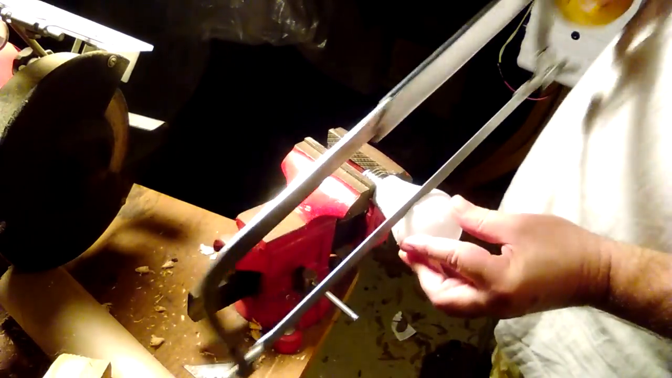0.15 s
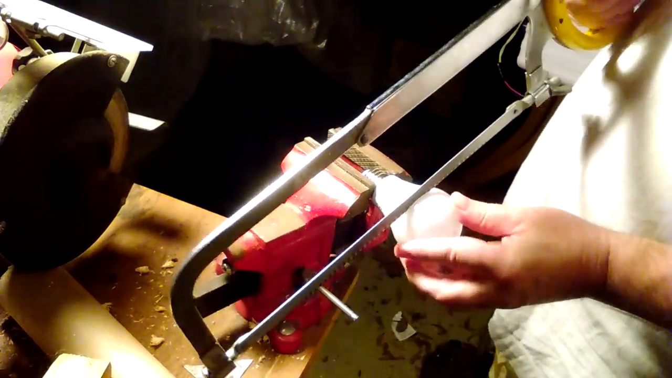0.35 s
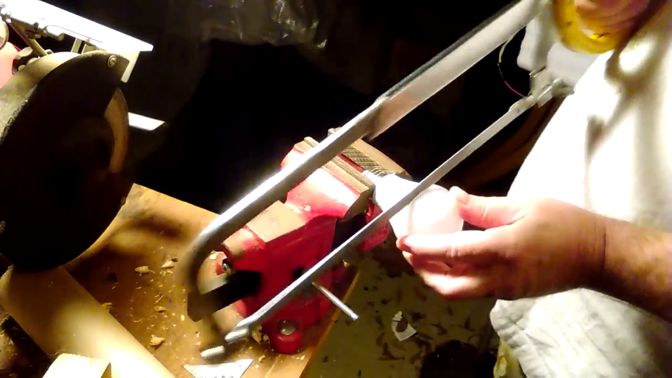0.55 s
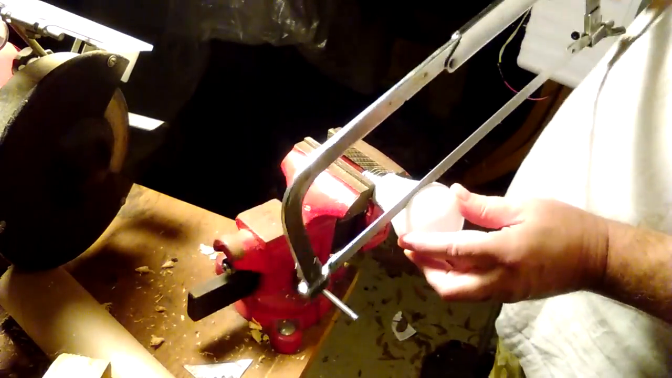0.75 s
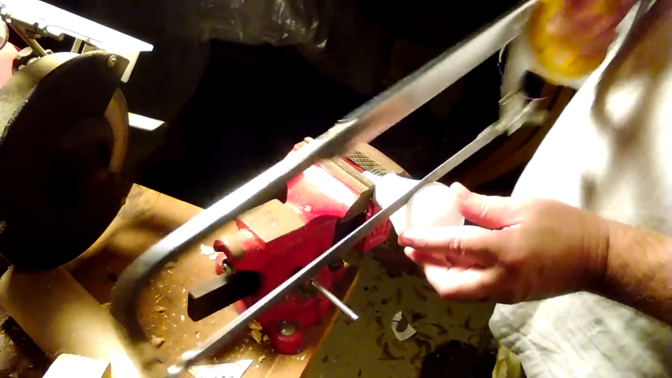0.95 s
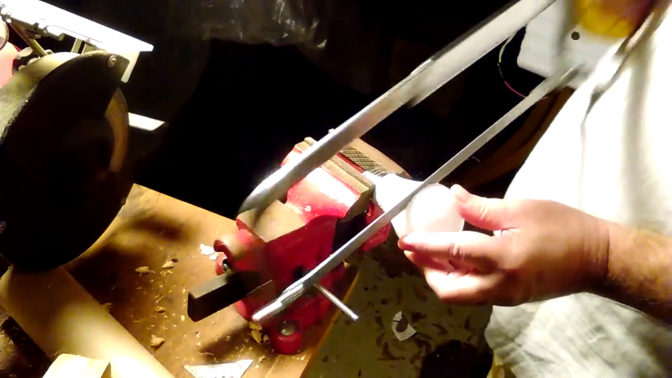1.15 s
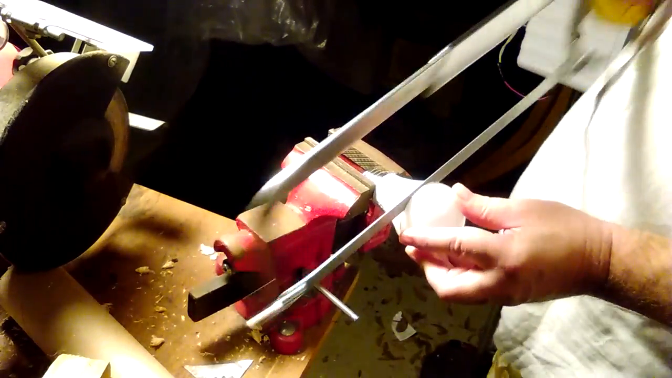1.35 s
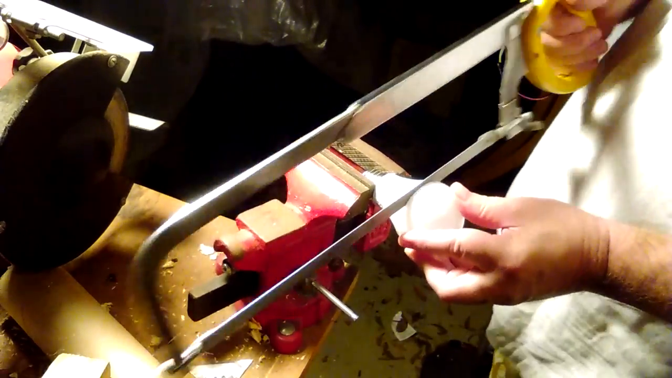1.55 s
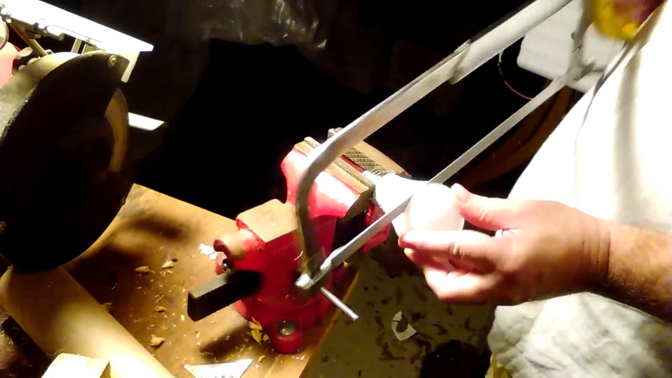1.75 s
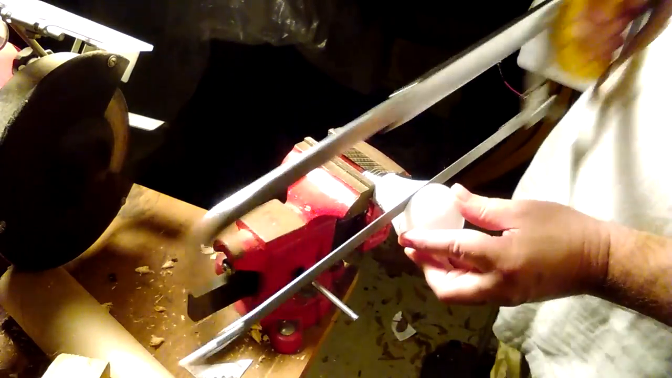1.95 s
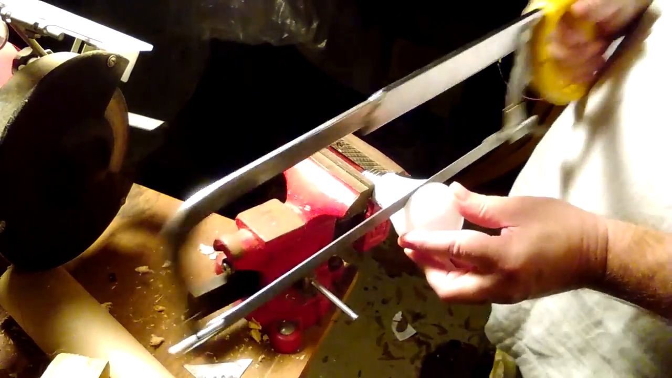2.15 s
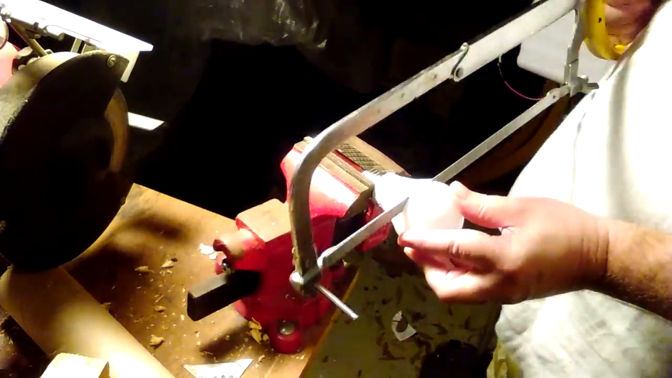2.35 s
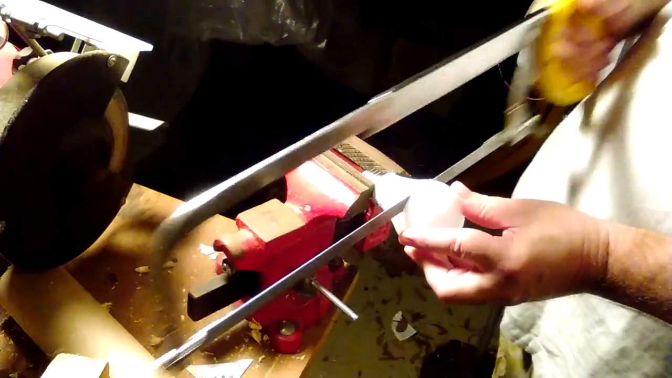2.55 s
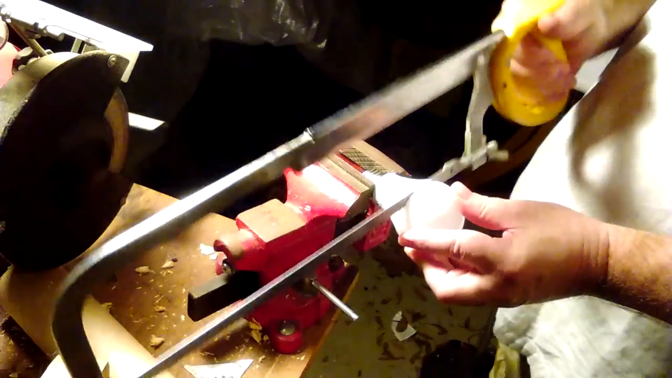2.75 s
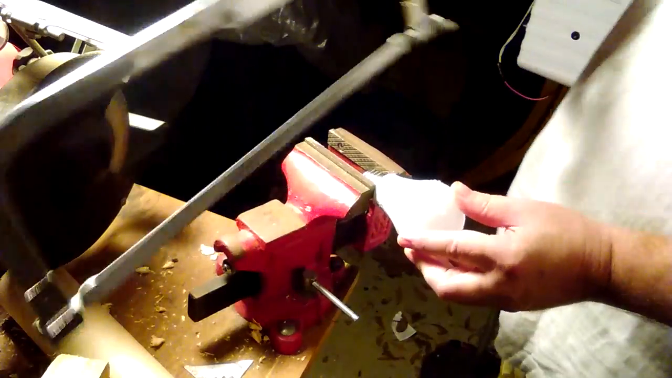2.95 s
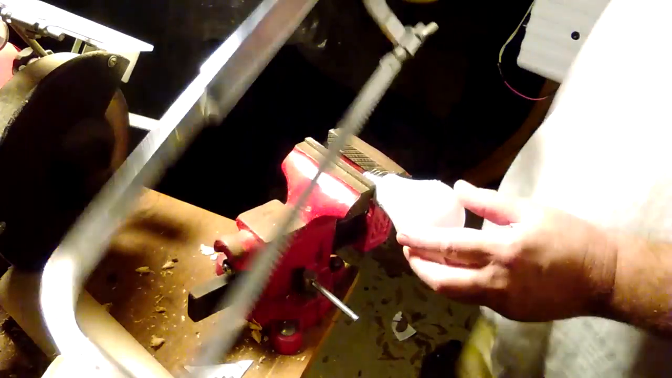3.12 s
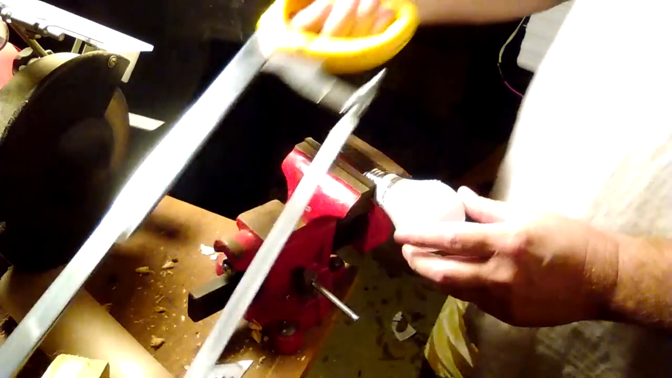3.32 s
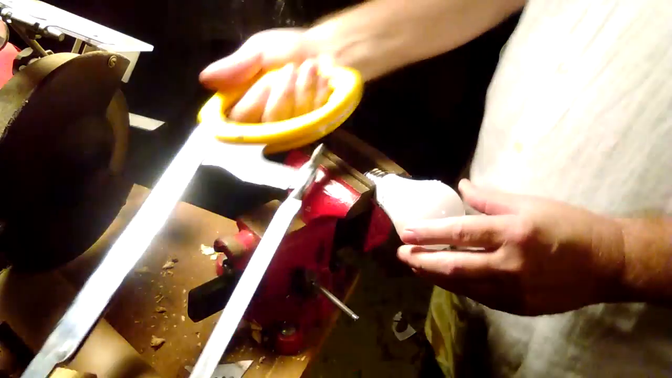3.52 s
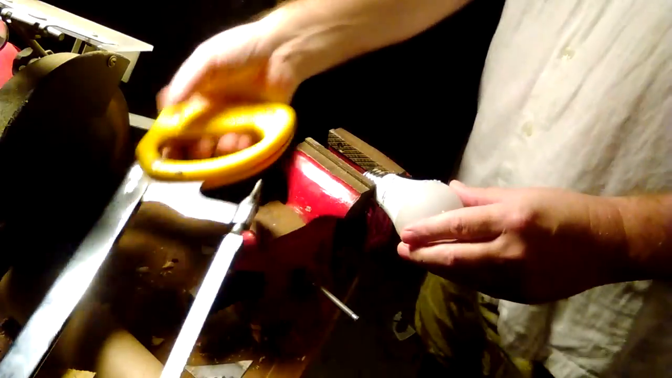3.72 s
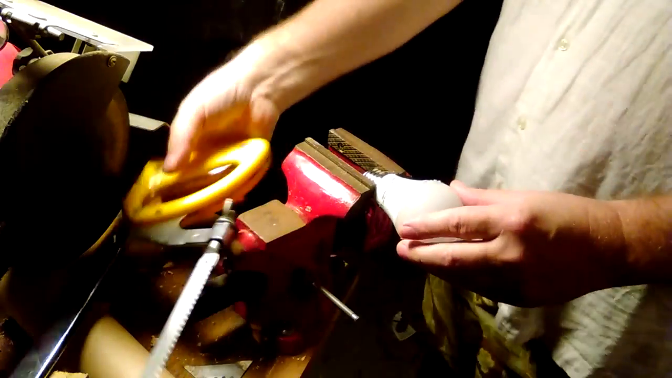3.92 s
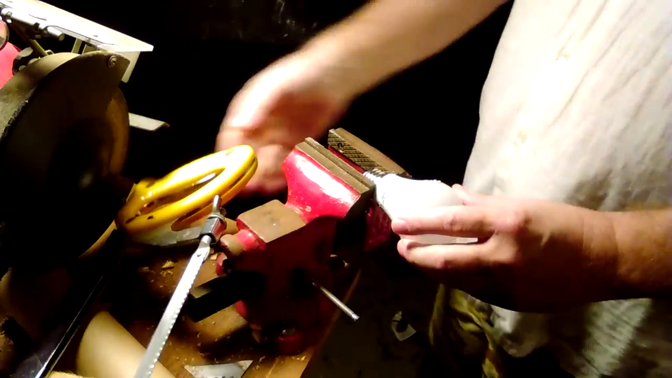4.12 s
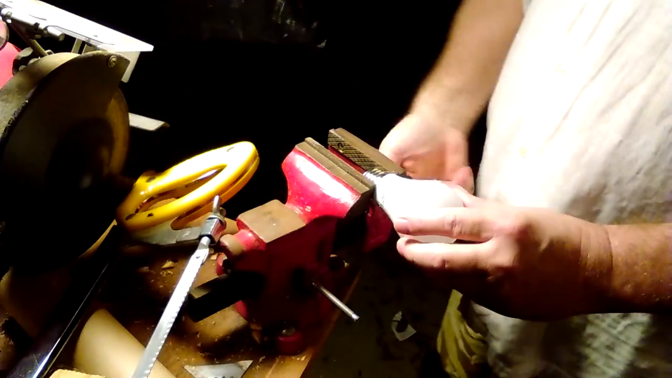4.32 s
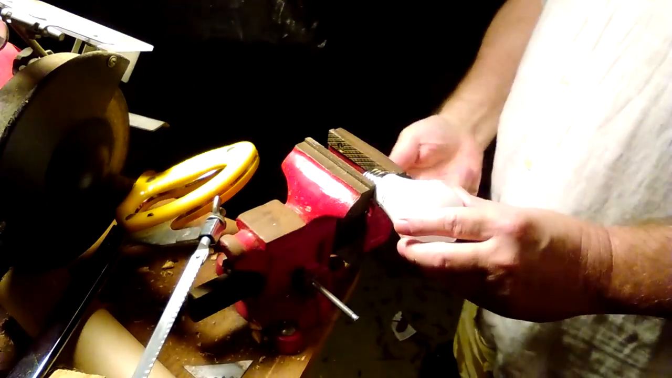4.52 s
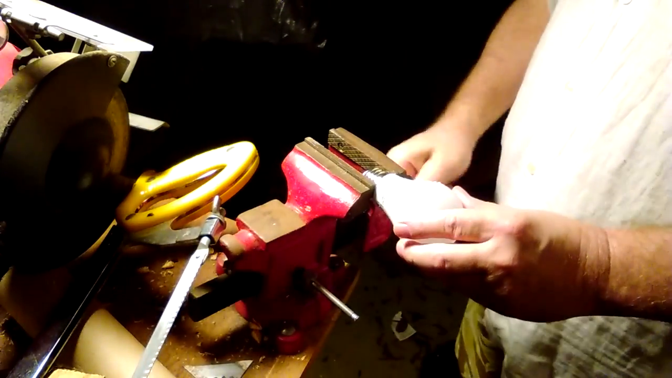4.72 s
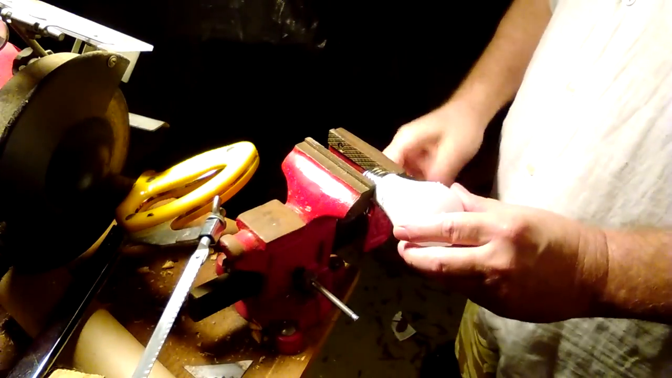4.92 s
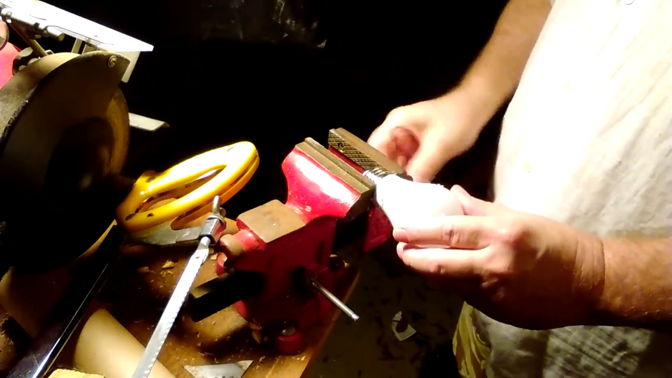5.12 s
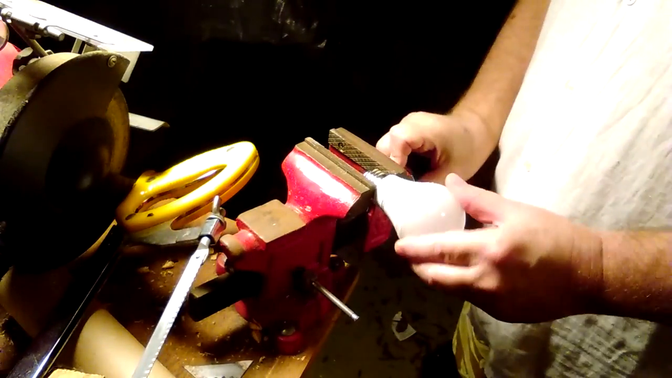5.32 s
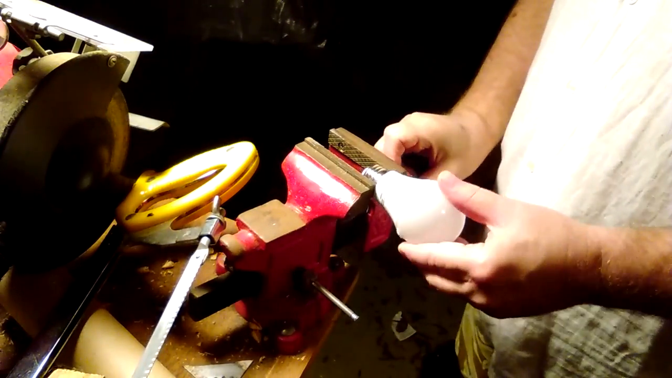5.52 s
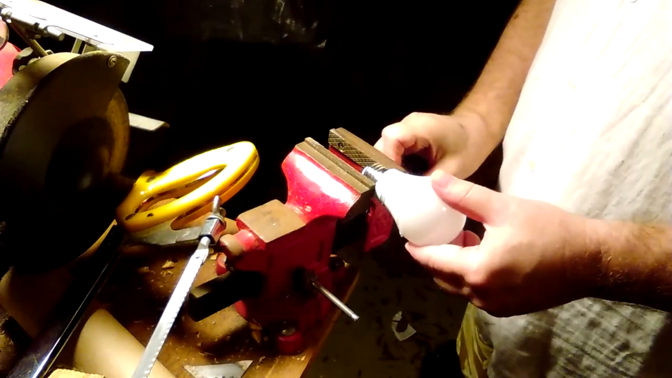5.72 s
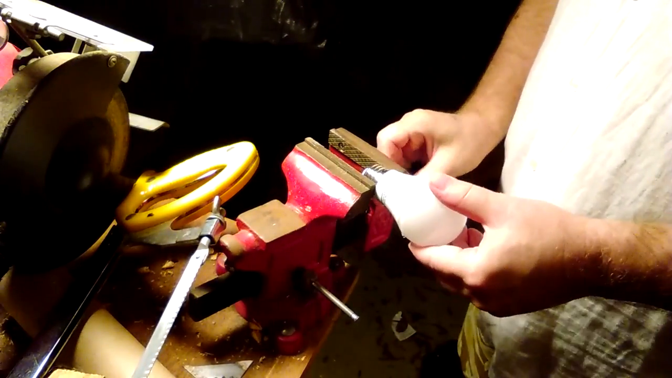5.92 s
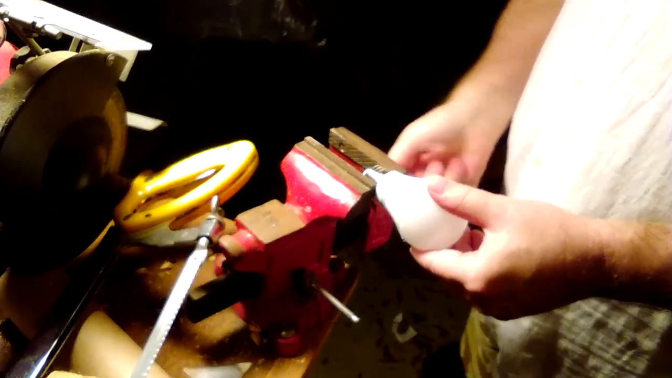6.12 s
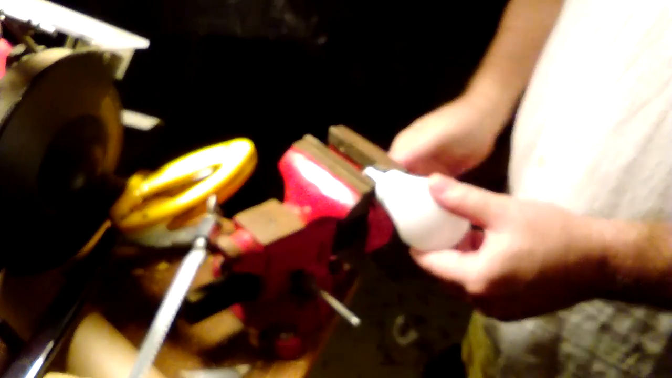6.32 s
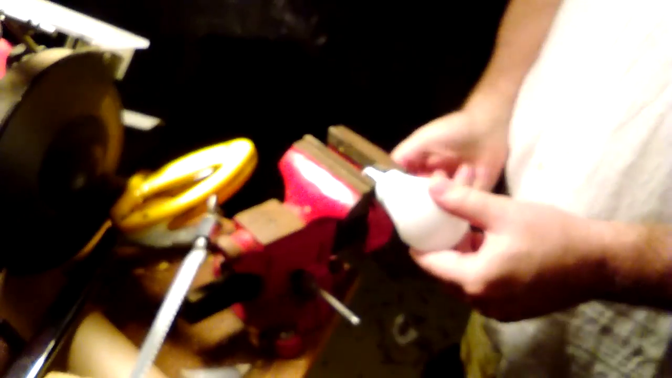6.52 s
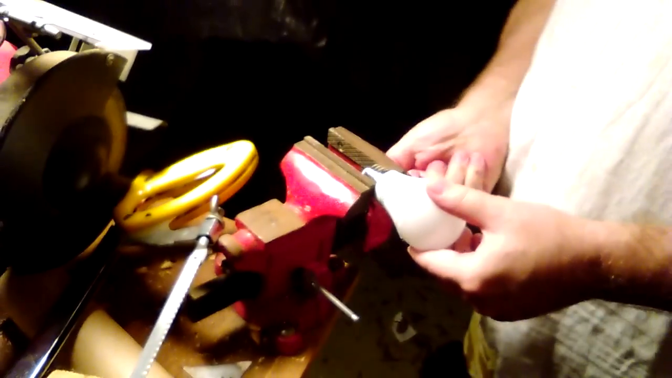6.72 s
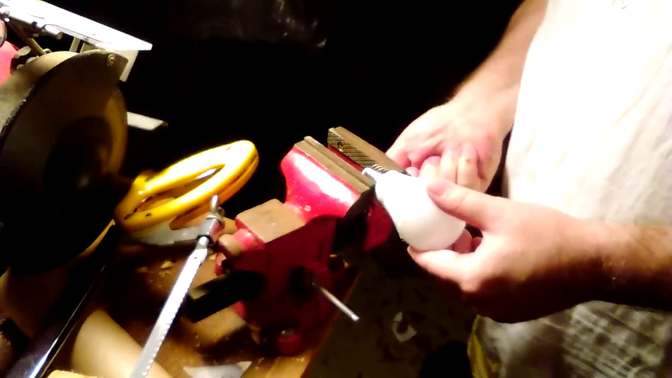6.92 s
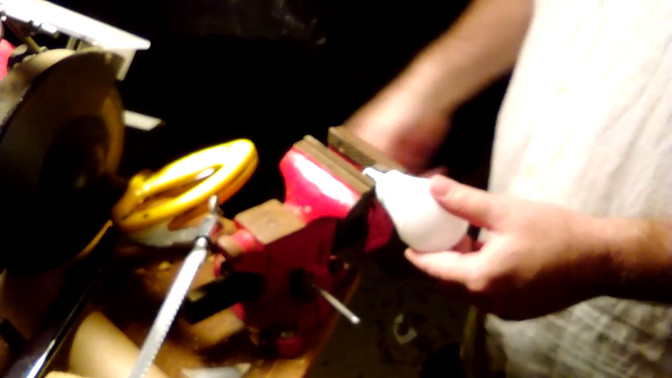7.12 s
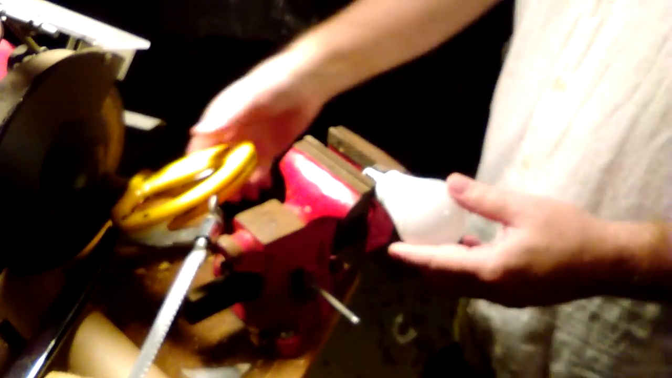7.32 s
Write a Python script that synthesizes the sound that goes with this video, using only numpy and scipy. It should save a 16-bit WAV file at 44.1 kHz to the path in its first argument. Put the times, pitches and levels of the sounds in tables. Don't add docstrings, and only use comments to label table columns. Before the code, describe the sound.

A hand hacksaw rasps loudly through plastic in a vise, squeals free, clatters onto a bench, then quiet clicks and creaks of handling follow.

```python
import sys
import numpy as np
from scipy import signal
from scipy.fft import rfft, irfft
from scipy.io import wavfile
from scipy.ndimage import uniform_filter1d, minimum_filter1d, map_coordinates

SR = 44100
rng = np.random.default_rng(int(sys.argv[2]) if len(sys.argv) > 2 else 0)


def bounce(signal):
    frames = np.transpose(np.atleast_2d(signal))
    limited = np.clip(frames, -1, 1)
    pcm = np.round(limited * 32767).astype(np.int16)
    wavfile.write(sys.argv[1], SR, pcm)


def gain_from_db(level_db):
    decades = np.asarray(level_db, float) / 20
    return 10 ** decades


N = 329427

# start in seconds, length in seconds, then levels in dB of
STROKES = [(-.05, 0.042, -19.5, -24.5, -13), (0.164, 0.067, -22, -20, -19.5), (.42, 0.026, -44, -56, -74),
           (0.64, 0.11, -11.5, -10, -7.5), (0.886, 0.1, -9, -13.5, -9.5), (1.11, 0.18, -12.5, -10.5, -7),
           (1.388, 0.11, -10.5, -11, -10.5), (1.634, 0.17, -11, -13, -10), (1.891, .175, -11.5, -14, -8),
           (2.19, 0.22, -11, -10.5, -12), (2.46, 0.19, -9, -11, -13), (2.706, 0.058, -25, -33, -19.5)]
# teeth per second at the top of the arch,
# evenness of the bite 0-1, lateness of the arch in seconds.
TRAVEL = [(580, .5, 0), (400, .6, 0), (330, .3, 0), (510, .8, .005), (610, .3, .03), (660, .35, -.02),
          (655, .35, .055), (710, .2, .03), (725, .85, .025), (650, .15, 0), (700, .45, .07), (420, .4, 0)]
# sag in dB of upper blade, lower blade, vise;
# level in dB of the upper vise modes.
LEAN = [(-0.5, -2.5, 0, 0), (1, 2, 2, 3.5), (3, 1, 0, 17), (4, 3, 1, 1.5), (2, 3, 7, 1.5),
        (-1.5, 4, 3, 2.5), (-2, -1, -5, 2), (-1.5, -5, -1, 6), (2, -2, 1.5, -2), (-1.5, -2, -1.5, 3.5),
        (-1, -1.5, -4, 1), (3.5, 15, 15.5, -9.5)]
# vise start in Hz, vise end in Hz,
# lower blade start in Hz, lower blade end in Hz.
FOCUS = [(600, 410, 4700, 9500), (443, 440, 6100, 4300), (600, 520, 7000, 9100), (780, 640, 4500, 4370),
         (523, 800, 5900, 3800), (600, 630, 4500, 4400), (528, 420, 4500, 4100), (520, 690, 4700, 4940),
         (597, 440, 4000, 5000), (650, 720, 5150, 4100), (660, 420, 5000, 4300), (500, 330, 4000, 4800)]
# start in Hz, end in Hz.
UPPER_FOCUS_HZ = [(6500, 7100), (6550, 6500), (6460, 5500), (6500, 7300), (6400, 7800), (6140, 6500),
                  (6300, 8000), (6300, 6600), (6700, 7000), (7000, 7000), (6850, 6700), (6600, 5700)]
UPPER_VISE_HZ = [980, 950, 1000, 990, 1030, 1030, 950, 950, 1000, 1000, 1210, 1000]
# start in seconds, length in seconds,
# pitch in Hz, level in dB.
CATCHES = [(0.64, .025, 710, -17.5), (.66, 0.015, 990, -20.5), (0.728, 0.033, 393, -21),
           (0.863, .04, 510, -23), (1.14, .09, 600, -15.5), (1.174, .03, 690, -14),
           (1.275, 0.027, 700, -20), (1.24, 0.037, 497, -20), (1.489, 0.024, 650, -16),
           (1.725, 0.031, 722, -17), (1.715, 0.085, 950, -20), (1.813, 0.022, 616, -22),
           (2.02, 0.021, 650, -13), (2.047, .02, 500, -17), (2.283, 0.02, 1085, -15.5),
           (2.27, 0.023, 654, -31), (2.43, 0.066, 652, -16), (2.524, 0.039, 590, -20),
           (2.61, 0.05, 605, -16), (2.641, 0.031, 760, -17.5), (2.668, 0.021, 652, -20.5),
           (2.64, 0.021, 495, -17), (2.697, 0.038, 370, -26)]
# pitch in Hz, width in Hz, level in dB.
VISE_MODES = [(370, 47, -7), (495.4, 35, 2.5), (604, 23.6, 1.5), (652, 54, 0), (739, 72, -7.5),
              (936, 44, -2.5), (1085, 66, -0.5), (1223, 160, 0.5)]
# pitch in Hz, width in Hz, level in dB.
UPPER_BLADE = [(5820, 180, -7), (6090, 93, -2.5), (6493, 253, 1), (7440, 770, -6), (8410, 1600, -10.5),
               (11550, 500, -14.5)]
# pitch in Hz, width in Hz, level in dB.
LOWER_BLADE = [(1853, 6.1, -6), (3247, 110, -10), (4060, 57, -6), (4550, 205, -6.5), (5130, 290, -3)]
# frequency in Hz, density in dB per Hz.
TEARING = [(59, -36.5), (100, -15.5), (208, -5), (279, -16.5), (502, -13.5), (703, -3.5), (2800, -21),
           (4640, -14.5), (5600, -6), (6620, -0.5), (9460, -18.5), (13800, -32), (15600, -42.5)]

# time in seconds, peak in dB, thud
# in dB, ring in dB.
TICKS = [(0.1105, -6.5, -36.5, -37), (0.395, -39, -33.5, -24), (0.4174, -26, -32, -4),
         (0.4304, -21.5, -32.5, -8), (0.4678, -21.5, -44, -15), (0.5864, -14, -52.5, -30),
         (0.5906, -39, -32, -26), (1.8152, 8, -15, -35), (1.886, 10.5, -30, -18), (2.147, -8, -21.5, -8),
         (2.372, -1, -16.5, -25.5), (2.482, 9, -30, -20.5), (2.7262, -4, -29, -17), (2.7457, 0, -32, -20.5),
         (2.7686, -28, -43, -20), (2.812, -3, -27, -24), (2.8305, 9, -43, -11.5), (2.8335, -5, -27, -16),
         (2.8374, 6, -28, -8), (3.0255, -22, -37, -20), (3.0904, -29.5, -47, -28),
         (3.2101, -32, -39.5, -10.5), (3.3034, -32, -49, -10), (3.5062, -8, -25, -36),
         (3.7259, -17, -35, -39), (4.1965, -16, -34, -17)]
# pitch in Hz, level in dB, time to fall 60 dB in seconds.
BLADE_TINKS = [(4600, -6, .02), (5200, -3, .025), (6600, 0, .03), (7300, -3, .03)]
# frequency in Hz, density in dB per Hz.
TOOTH_CLICK = [(300, -39), (900, -8), (1400, 0.5), (2670, -11.5), (4400, 4.5), (7140, 2), (13600, -36),
               (15000, -50)]
# time in seconds, slips per second, level in dB.
SQUEAL = [
    (2.763, 680, -45),
    (2.768, 682, -19),
    (2.779, 686, -24),
    (2.8, 690, -28),
    (2.814, 694, -45),
]

# time in seconds, peak in dB, thud in dB, ring in dB.
SAW_HITS = [(3.5050, -10, -5.5, 2), (3.8394, 5, -24, -24), (3.8743, -7.5, -16.5, -32),
            (3.9494, 5.5, -15.5, -40), (3.9894, -1.5, -35, -5), (4.0365, 4.5, -37, -13),
            (4.0800, -5, -43, -3), (4.0895, -6, -23, -31), (4.2019, -4.5, -29, -2.5),
            (4.2330, -2.5, -28, -11.5), (4.2567, -8, -44, -26), (4.2776, -6, -24, -9)]
# pitch in Hz, level in dB, time to fall 60 dB in seconds.
FRAME = [(900, -8, .06), (1120, -12, .06), (2200, -4, .04), (2550, -5, .045), (3130, -6, .04),
         (4250, -6, .035), (4750, -8, .035), (5300, -8, .04), (6750, -9, .05)]
# pitch in Hz, level in dB, time to fall 60 dB in seconds.
BENCH_UNDER_SAW = [(620, -6, .05), (880, -6, .06)]
# frequency in Hz, density in dB per Hz.
CRACK = [(470, -56), (800, 3), (1550, 2.5), (2210, 7), (3490, 2.5), (4090, 8.5), (6600, 5.5),
         (12200, -18.5), (14300, -25.5), (15500, -41)]
# frequency in Hz, density in dB per Hz.
THUD = [(60, -21), (150, 2.5), (400, 2), (720, 2.5), (1300, -6), (1900, -12), (3000, -14), (6000, -48)]

# time in seconds, then levels in dB of bow, bench boom, free blade, frame.
PEALS = [
    (0.111, -38, -60, -60, -47),
    (.42, -47, -63, -57, -60),
    (2.836, -33, -57, -27, -60),
    (3.505, -20.5, -30, -59, -27.5),
    (3.846, -24.5, -10, -35.5, -27),
    (3.95, -34, -39.5, -33, -34),
    (4.202, -20, -23, -42, -41),
    (4.26, -21, -22.5, -41, -28),
]
# pitch in Hz, level in dB, time to fall 60 dB in seconds.
BOW = [(1858, -5.5, 0.63), (1800, -14, .4), (3350, -13.5, .45), (3310, -7, .4)]
# pitch in Hz, level in dB, time to fall 60 dB in seconds.
BOOM = [(489, 3, .3), (523, -17, 0.32), (590, -9.5, .15)]
# pitch in Hz, level in dB, time to fall 60 dB in seconds.
FREE_BLADE = [(3590, -9, 0.57), (3270, -6, .15), (4700, -25, .35), (6400, -5, 0.15), (6700, -7, .22),
              (7540, 3, 0.24), (7100, 16, 0.12), (7900, 2, 0.24)]
# pitch in Hz, level in dB, time to fall 60 dB in seconds.
FRAME_RING = [(1123, -2, 0.42), (1913, 5, 0.32), (2650, -14, 0.33), (4330, -5, .18), (5220, -16, .2),
              (6300, -15, .35), (7100, -22, .28)]

# time in seconds, peak in dB, thud in dB, ring in dB.
HANDLE_HITS = [(4.7225, -31, -23, 1), (4.7305, -15, -24, -6), (4.778, -9, -21.5, 0), (4.7895, -17, -19, -6),
               (4.846, -37, -48, -10), (4.868, -37, -46, -10), (4.934, -36, -33, -4), (4.958, -40, -42, -4),
               (5.0914, -51, -33, -24), (5.1616, -38, -33.5, -23), (5.181, -42, -39, 7),
               (5.205, -42, -36, -3), (5.237, -21, -36, -3), (5.258, -40, -29, 3), (5.3055, -30.5, -33, -5),
               (5.4304, -35.5, -45, 2), (5.5344, -50, -34, 10), (5.5613, -30.5, -30, 4),
               (5.6155, -27, -49, -4), (5.6594, -37, -34, -20), (5.799, -37, -39, -8),
               (5.9934, -58, -43, 6), (6.0258, -53, -31, 2), (6.0694, -28, -28, -45),
               (6.124, -31, -39, -38), (6.1665, -50, -40, -10), (6.1975, -26.5, -43, -25),
               (6.5047, -45, -51, -9), (6.9058, -49, -43.5, -9), (7.1312, -54, -53.5, -18),
               (7.2384, -46.5, -45, -16.5), (7.434, -25.5, -43.5, -28.5)]
# pitch in Hz, level in dB, time to fall 60 dB in seconds.
HANDLE = [(1027, -7, 0.07), (1240, -18, 0.14), (2770, -15.5, 0.098), (4100, -11, .035), (3550, -18, 0.052),
          (4750, -8, 0.027), (5360, -16.5, 0.083), (7550, -45.5, 0.048), (9160, -43, .15)]
# pitch in Hz, level in dB, time to fall 60 dB in seconds.
BENCH_UNDER_VISE = [(565, -5.5, 0.042), (694, 8, 0.031), (717, -7, 0.081), (1068, -8.5, 0.062),
                    (1280, -19, 0.046)]
# frequency in Hz, density in dB per Hz.
KNOCK = [(60, -28), (250, 2), (700, 3.5), (1400, -3), (2100, -11.5), (5000, -43.5)]
# start in seconds, length in seconds, level in dB,
# favoured pitch in Hz.
CREAKS = [(4.76, .01, -49, 750), (4.785, 0.013, -43, 760), (5.098, .03, -50, 560), (5.235, 0.023, -38, 750),
          (5.573, .04, -43, 746), (5.97, .03, -38, 750), (6.023, 0.046, -40, 780),
          (6.065, 0.015, -23, 1470), (6.159, 0.037, -32.5, 570), (6.526, 0.034, -49, 750),
          (7.247, 0.022, -51, 746)]
# pitch in Hz, width in Hz, level in dB.
VISE_BODY = [(328, 41, 6.5), (560, 200, -2), (760, 31, 2), (1034, 29, 2), (1320, 96, -14.5),
             (1530, 120, -9)]

# start in seconds, length in seconds, level in dB.
SHIFTS = [(2.99, 0.015, -46.5), (3.4, 0.028, -54), (3.7, 0.02, -40), (4.0, 0.045, -22.5),
          (4.2, 0.13, -29.5), (4.88, 0.024, -36), (5.2, 0.14, -38.5), (5.4, 0.29, -46), (6.05, 0.027, -43),
          (6.52, 0.068, -65), (6.95, 0.16, -60)]
# start in seconds, length in seconds, level in dB.
CHATTERS = [
    (2.8, 0.059, -26),
    (3.56, 0.17, -37.5),
    (3.88, 0.036, -26),
    (4.0, 0.065, -11),
    (4.22, 0.064, -22.5),
    (5.3, 0.082, -51),
    (6.85, 0.055, -69),
    (7.42, .05, -53),
]
# start in seconds, length in seconds, level in dB.
RUBS = [
    (4.75, 0.004, -37),
    (4.81, 0.018, -41),
    (5.152, 0.039, -42),
    (6.035, 0.061, -45),
    (6.125, .03, -52),
]
# pitch in Hz, width in Hz, level in dB.
BORE = [(5340, 22, 0), (8450, 60, -10), (9000, 70, -14), (12280, 90, -17)]
# start in seconds, length in seconds,
# level in dB.
SLIDES = [
    (3.393, 0.018, -27),
    (5.39, .01, -51),
    (5.566, .005, -33.5),
    (6.0, .005, -43),
    (7.13, 0.0091, -42),
    (7.244, .005, -45.5),
]
# start in seconds, length in seconds, level in dB.
WIPES = [
    (3.675, 0.03, -40),
    (5.455, .01, -44.5),
    (6.61, .04, -47),
    (6.98, 0.028, -31),
    (7.18, .04, -53),
]
# frequency in Hz, density in dB per Hz.
SLIDE = [(880, 3.5), (1500, 0.5), (2670, -1), (4160, 6.5), (7140, 5), (13600, -17), (14600, -29),
         (15000, -58)]
# time in seconds, level in dB.
SCREW = [
    (5.35, -75),
    (5.45, -54),
    (5.7, -52),
    (5.95, -54),
    (6.02, -75),
]

# start in seconds, length in seconds, level in dB.
JOLTS = [
    (0, 0.32, -30.5),
    (.76, 0.044, -24),
    (1.1, 0.022, -30),
    (1.33, 0.028, -20.5),
    (1.55, 0.14, -28.5),
    (1.84, 0.031, -26.5),
    (2.14, 0.024, -20.5),
    (2.44, 0.018, -22),
    (2.62, 0.099, -28),
    (6.1, 0.071, -40),
]
# start in seconds, length in seconds, level in dB.
KICKS = [
    (3.51, 0.068, -27),
    (3.845, 0.19, -23),
    (4.2, 0.035, -33),
    (4.73, 0.078, -31),
]
# frequency in Hz, density in dB per Hz.
SHAKE = [(20, -13.5), (45, 5.5), (95, 6.5), (190, -1), (300, -37)]
# frequency in Hz, density in dB per Hz.
FLOOR = [(12, -26.5), (20, -0.5), (38, -17), (59, -4.5), (82, -18.5), (211, -26), (1590, -48), (4950, -55),
         (6360, -52.5), (10800, -56.5), (13800, -54.5), (15000, -69)]
# frequency in Hz, side minus mid in dB.
WIDTH = [(60, -38), (700, -50), (3800, -56), (4600, -30), (5500, -11), (7000, -7), (9000, -4), (13800, -3),
         (14500, -30)]

SLOW_TEETH_PER_S, RUN_UP_S, ARCH_POWER = 300, 0.032, .9
LIFT_S, SET_DOWN_S = .5, .588
IDLE_DB = -57.5
TOP_HZ = 14350


def rms_one(x):
    return x / np.sqrt(np.mean(x ** 2) + 1e-20)


def in_time(rows, outside=None):
    s, *columns = np.transpose(rows)
    return [np.interp(np.arange(N) / SR, s, c, outside, outside) for c in columns]


def colour(x, points):
    size = 8192
    hz, level_db = np.transpose(points)
    log_hz = np.log(np.maximum(np.fft.rfftfreq(size, 1 / SR), 1))
    cepstrum = irfft(np.log(gain_from_db(np.interp(log_hz, np.log(hz), level_db))))
    cepstrum[1:size // 2] *= 2
    cepstrum[size // 2 + 1:] = 0
    return signal.oaconvolve(x, irfft(np.exp(rfft(cepstrum))))[:N]


def band(x, low_hz, high_hz):
    return signal.sosfilt(signal.butter(2, [low_hz, high_hz], "band", fs=SR, output="sos"), x)


def drift(rate_hz):
    knots = rng.standard_normal(4000)
    t = np.arange(0, N + 32, 32) / SR
    return np.interp(np.arange(N) / SR, t, map_coordinates(knots, [t * rate_hz * 2], order=3))


def resonate(x, peaks, wander_db=0, focus_hz=None, db_per_oct=0):
    out = 0
    for k, (hz, width, level_db) in enumerate(peaks):
        off_db = 0
        if focus_hz is not None:
            off_db = np.minimum(db_per_oct * np.abs(np.log2(hz / focus_hz)), 9.0)
        gain = (-1) ** k * gain_from_db(level_db + wander_db * drift(11.0) - off_db)
        r = np.exp(-np.pi * max(width, 3) / SR)
        b = [(1 - r * r) / 2, 0, (r * r - 1) / 2]
        a = [1, -2 * r * np.cos(2 * np.pi * hz / SR), r * r]
        out = out + signal.lfilter(b, a, gain * x)
    return out


def grains(per_s, spread_db):
    sizes = gain_from_db(spread_db * np.minimum(rng.exponential(1, N), 5)) * rng.choice([-1, 1], N)
    return rms_one(sizes * (rng.random(N) < per_s / SR))


def steady(x, over_s):
    return x / np.sqrt(uniform_filter1d(x ** 2, int(over_s * SR)) + 0.064 * np.mean(x ** 2))


def swells(rows, rise_db_per_s, fall_db_per_s, sag_db=0):
    t = np.arange(0, N + 32, 32) / SR
    s, length, level_db = np.transpose(rows)[:, :, None]
    length = np.maximum(length, 1e-3)
    loss_db = rise_db_per_s * np.maximum(s - t, 0)
    loss_db = loss_db + fall_db_per_s * np.maximum(t - s - length, 0)
    loss_db = loss_db + sag_db * np.clip((t - s) / length, 0, 1)
    power = np.sum(gain_from_db(np.maximum(level_db - loss_db, -150)) ** 2, axis=0)
    return np.interp(np.arange(N) / SR, t, np.sqrt(power))


def impulses(s, level_db):
    clicks = np.zeros(N)
    clicks[np.round(s * SR).astype(int)] = gain_from_db(level_db)
    return clicks + 1e-18


def ring(clicks, hz, t60):
    r, w = gain_from_db(-60 / (t60 * SR)), 2 * np.pi * hz / SR
    return signal.lfilter([0, np.sin(w)], [1, -2 * r * np.cos(w), r * r], clicks)


def air():
    rumble = rms_one(colour(rng.standard_normal(N), SHAKE))
    hiss = rms_one(colour(rng.standard_normal(N), FLOOR))
    jolts = swells(JOLTS, 151, 78.5)
    kicks = swells(KICKS, 2500, 87)
    still = gain_from_db(-40.5)
    return gain_from_db(-37.5) * hiss + gain_from_db(-2.5) * (jolts + kicks + still) * rumble


def blade_travel():
    t = np.arange(N) / SR
    per_s, even = np.full(N, float(SLOW_TEETH_PER_S)), np.zeros(N)
    for (s, length, *_), (top_per_s, top_even, late_s) in zip(STROKES, TRAVEL):
        along = np.clip((t - s - late_s + RUN_UP_S) / (length + 2 * RUN_UP_S), 0, 1)
        arch = np.sin(np.pi * along) ** ARCH_POWER
        per_s = np.maximum(per_s, SLOW_TEETH_PER_S + (top_per_s - SLOW_TEETH_PER_S) * arch)
        even = np.maximum(even, top_even * arch)
    return per_s, np.clip(even, 0, 1)


def along_strokes(start, end):
    s, length = np.transpose(STROKES)[:2]
    ones = np.ones(len(s))
    times = np.ravel([s, s + length], "F")
    return np.interp(np.arange(N) / SR, times, np.ravel([start * ones, end * ones], "F"))


def vise_shake(tearing, travel, even):
    vise_from, vise_to, *_ = np.transpose(FOCUS)
    upper_db = np.transpose(LEAN)[3]
    low_modes = resonate(tearing, VISE_MODES[:5], 1.76, along_strokes(vise_from, vise_to), 7.5)
    high_modes = resonate(tearing, VISE_MODES[5:], 1.7, along_strokes(UPPER_VISE_HZ, UPPER_VISE_HZ), 23.0)
    high_gain = gain_from_db(along_strokes(upper_db, upper_db) - 7.0)
    rattle = rms_one(low_modes + high_gain * high_modes)
    rattle = rattle + 0.5 * rms_one(band(colour(tearing, TEARING), 110, 1930))
    groan = np.sin(2 * np.pi * travel) + .2 * np.sin(4 * np.pi * travel)
    groan = groan * gain_from_db(2.0 * drift(30))
    groan = 0.7 * groan + 1.2 * resonate(groan, VISE_MODES)
    return 1.5 * even * groan + np.sqrt(1.05 - even ** 2) * steady(rattle, .05)


def blade_ring(tearing, bite):
    lower_from, lower_to = np.transpose(FOCUS)[2:]
    rasp = rms_one(colour(grains(10000, 2.8) * bite * gain_from_db(2.0 * drift(120)), TEARING))
    upper_focus = along_strokes(*np.transpose(UPPER_FOCUS_HZ))
    upper = rms_one(resonate(tearing, UPPER_BLADE, 2.5, upper_focus, 24))
    upper = upper + .85 * band(rasp, 4200, TOP_HZ + 2000)
    lower = rms_one(resonate(tearing, LOWER_BLADE, 3.0, along_strokes(lower_from, lower_to), 43.5))
    lower = lower + 2.13 * band(rasp, 1470, 4300)
    return steady(upper, 0.33), steady(lower, 0.045)


def sawing():
    s, length, upper_db, lower_db, vise_db = np.transpose(STROKES)
    upper_sag, lower_sag, vise_sag, _ = np.transpose(LEAN)

    def pressure(hold_s, level_db, sag_db):
        return swells(np.transpose([s, hold_s, level_db]), 360, 293.5, 1 + sag_db[:, None])

    on_upper = pressure(length, upper_db, upper_sag)
    on_lower = pressure(length, lower_db, lower_sag)
    on_vise = pressure(length + 0.017, vise_db, vise_sag)
    per_s, even = blade_travel()
    travel = np.cumsum(per_s * (1 + 0.041 * (1.1 - even) * drift(60))) / SR
    bite = 1 + 0.58 * np.cos(2 * np.pi * travel)
    tearing = grains(5500, 3.8) * bite * gain_from_db(2.0 * drift(60) + 2.0 * drift(170))
    vise = vise_shake(tearing, travel, even)
    upper, lower = blade_ring(tearing, bite)
    t = np.arange(N) / SR
    touching = np.abs(t - (LIFT_S + SET_DOWN_S) / 2) > (SET_DOWN_S - LIFT_S) / 2
    vise_swing = gain_from_db(3 * drift(7.013) - 3.0)
    return touching * (on_vise * vise_swing * vise + on_upper * gain_from_db(0.5) * upper - on_lower * gain_from_db(-1.0) * lower)


def blows(hits, modes, bench, crack, thud, crack_t60, thud_t60):
    s, peak_db, thud_db, ring_db = np.transpose(hits)

    def burst(level_db, t60, rise_s):
        r, q = gain_from_db(-60 / (t60 * SR)), np.exp(-1 / (rise_s * SR))
        return signal.lfilter([1 - q], np.convolve([1, -r], [1, -q]), impulses(s, level_db))

    out = burst(peak_db - 9, crack_t60, .0006) * rms_one(colour(grains(14000, 1.5), crack))
    out += burst(thud_db + 2, thud_t60, .002) * rms_one(colour(grains(6000, 2.0), thud))
    strength_db = 2.5 * rng.standard_normal((len(s), len(modes) + len(bench)))
    for k, (hz, level_db, t60) in enumerate(modes + bench):
        blow_db = peak_db + ring_db if k < len(modes) else thud_db - 4.5
        out += ring(impulses(s, blow_db + level_db + strength_db[:, k]), hz, t60)
    return out


def peals():
    s, *blows_db = np.transpose(PEALS)
    out = 0
    for modes, blow_db in zip((BOW, BOOM, FREE_BLADE, FRAME_RING), blows_db):
        clicks = impulses(s, blow_db)
        for hz, level_db, t60 in modes:
            out = out + gain_from_db(level_db) * ring(clicks, hz, t60)
    return out


def catches():
    out, t = 0, np.arange(N) / SR
    for s, length, hz, level_db in CATCHES:
        wobble = np.cumsum(13.8 * drift(40)) / SR
        tone = np.sqrt(2) * np.sin(2 * np.pi * (hz * t + wobble))
        out = out + swells([(s, length, level_db)], 508, 405) * tone
    return out


def squeal():
    per_s, _ = in_time(SQUEAL)
    _, level_db = in_time(SQUEAL, -120)
    slips = np.diff(np.floor(np.cumsum(per_s) / SR), prepend=0)
    return gain_from_db(level_db) * rms_one(band(band(slips, 5800, 8600), 5800, 8600))


def handling():
    bench = rms_one(colour(grains(3000, 2.5) * gain_from_db(2.0 * drift(41)), THUD))
    bench *= swells(SHIFTS, 152, 204) + gain_from_db(IDLE_DB)
    contacts = grains(7600, 1.2) * gain_from_db(2.0 * drift(36))
    chatter = rms_one(colour(contacts, CRACK)) + 0.26 * rms_one(resonate(contacts, UPPER_BLADE))
    chatter *= swells(CHATTERS, 243, 152) + gain_from_db(IDLE_DB + 5.5)
    rub = swells(RUBS, 900, 520) * rms_one(resonate(grains(9000, 1.0), BORE, wander_db=1.5))
    slides = swells(SLIDES, 1493, 279) + swells(WIPES, 300, 248)
    slides = slides * rms_one(colour(grains(21700, 1.6), SLIDE))
    thread = rms_one(resonate(grains(9000, 2.0), [(6850, 300, 0), (4600, 300, -6)]))
    screw = gain_from_db(in_time(SCREW, -90)[0] - 2) * thread
    return screw + bench + gain_from_db(-7.0) * chatter + gain_from_db(-1.5) * rub + gain_from_db(-6.5) * slides


def creaks():
    rows = np.array(CREAKS)
    focus_hz = np.interp(np.arange(N) / SR, rows[:, 0] + rows[:, 1] / 2, rows[:, 3])
    body = resonate(grains(1500, 1.9), VISE_BODY, 1.5, focus_hz, 7)
    return swells(rows[:, :3], 311, 303) * steady(body, 0.13)


def garage(x):
    t60_s = 0.38
    t = np.arange(SR // 2) / SR
    tail = 0
    for low, high, share in [(139, 1580, 1.0), (1552, 8050, 0.83), (7630, 8000, 0.75)]:
        tail = tail + band(rng.standard_normal(len(t)), low, high) * gain_from_db(-60 * t / (t60_s * share))
    tail *= np.minimum(t / 0.0047, 1)
    return gain_from_db(-13.5) * signal.oaconvolve(x, tail / np.sqrt(np.sum(tail ** 2)))[:N]


def scene():
    near = sawing() + peals() + catches() + squeal() + handling() + creaks()
    near += blows(TICKS, BLADE_TINKS, [], TOOTH_CLICK, THUD, crack_t60=.018, thud_t60=.05)
    near += blows(SAW_HITS, FRAME, BENCH_UNDER_SAW, CRACK, THUD, crack_t60=0.11, thud_t60=0.11)
    near += blows(HANDLE_HITS, HANDLE, BENCH_UNDER_VISE, CRACK, KNOCK, crack_t60=.035, thud_t60=.11)
    return np.tile(near + garage(near) + air(), (2, 1))


def top_cut(x):
    return signal.sosfilt(signal.butter(12, 15600, fs=SR, output="sos"), x)


def record(dry):
    side = colour(dry[0] * drift(110), WIDTH)
    pair = np.array([dry[0] + side, dry[0] - side])
    ceiling, reach = 1.094, int(0.0015 * SR)
    gain = ceiling / np.maximum(np.abs(pair).max(axis=0), ceiling)
    held = pair * uniform_filter1d(minimum_filter1d(gain, reach), reach)
    cut = signal.sosfiltfilt(signal.ellip(8, .3, 70, TOP_HZ, fs=SR, output="sos"), held)
    loud = uniform_filter1d(dry[0] ** 2, 1024) > gain_from_db(-22)
    patches = uniform_filter1d(1.0 * (loud & (drift(7) > .3)), 512)
    return top_cut(cut + gain_from_db(-5.0) * patches * (held - cut))


dry = scene()
out = record(dry)
bounce(out)
```